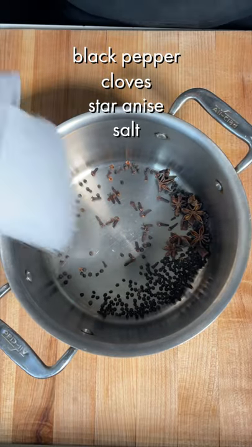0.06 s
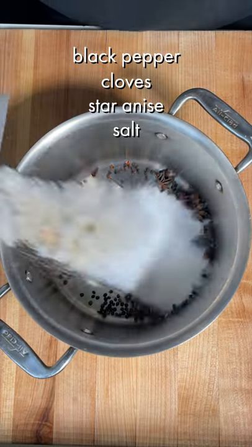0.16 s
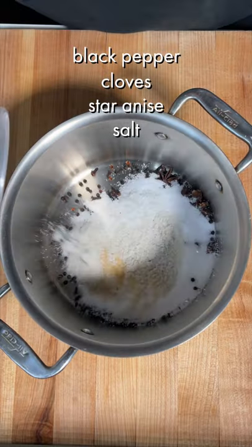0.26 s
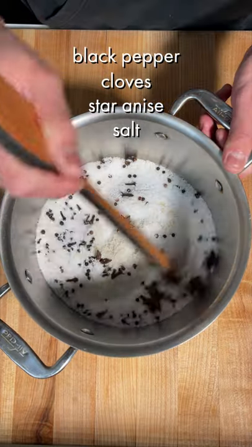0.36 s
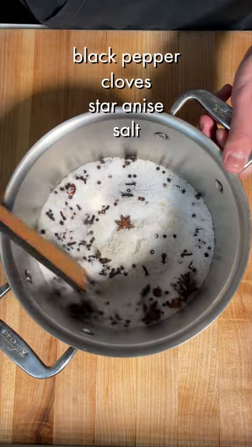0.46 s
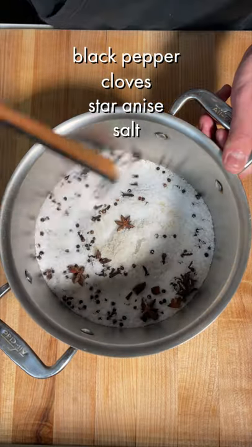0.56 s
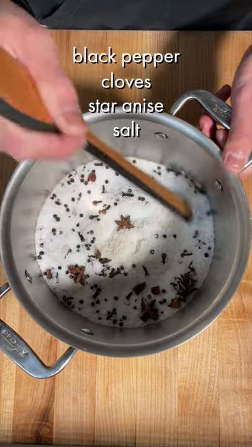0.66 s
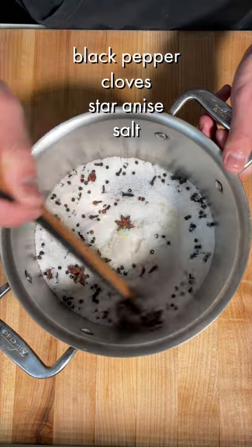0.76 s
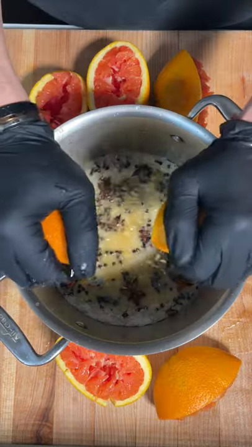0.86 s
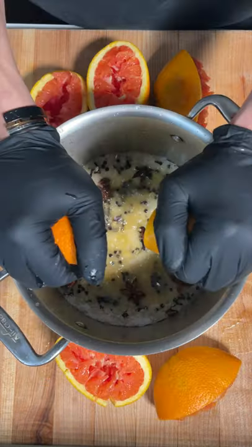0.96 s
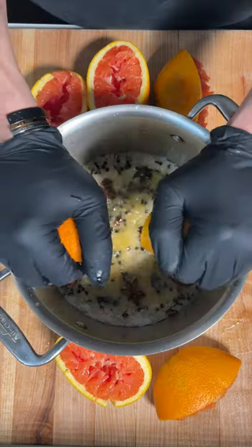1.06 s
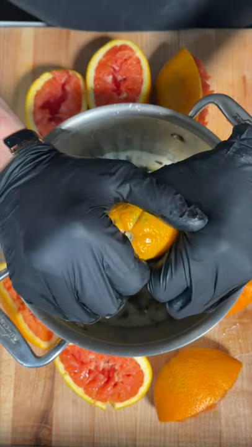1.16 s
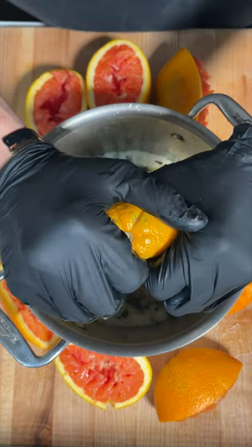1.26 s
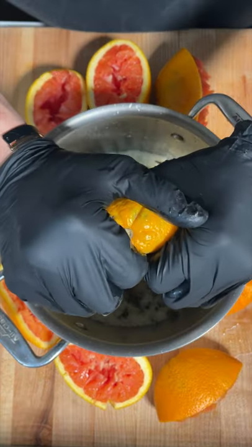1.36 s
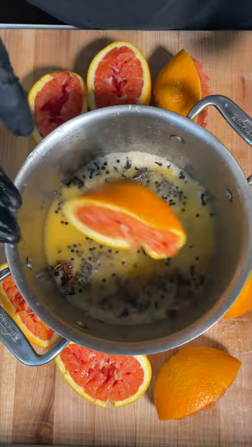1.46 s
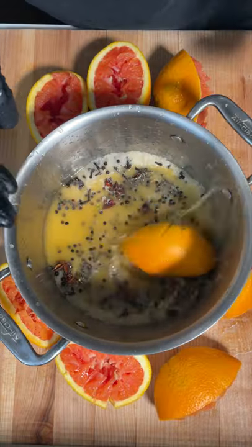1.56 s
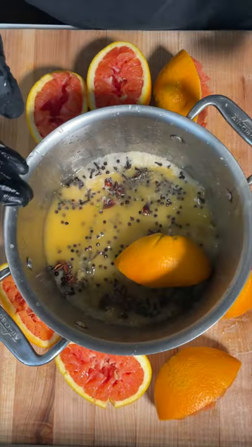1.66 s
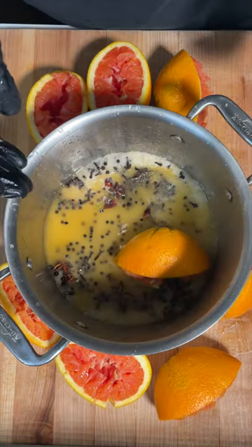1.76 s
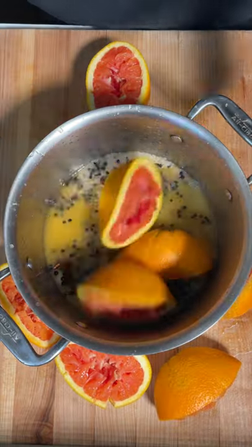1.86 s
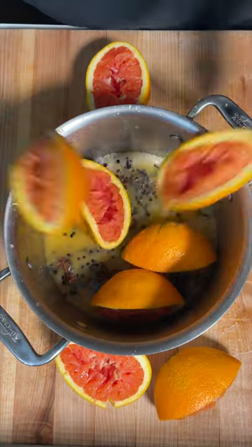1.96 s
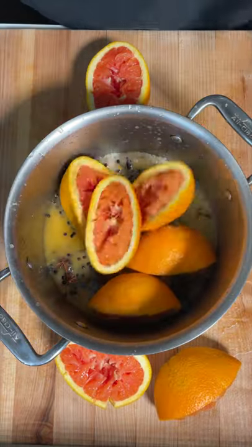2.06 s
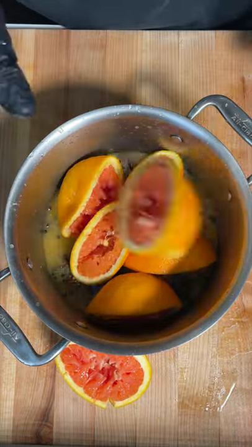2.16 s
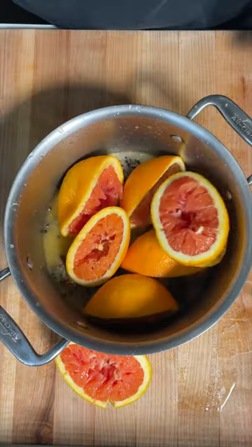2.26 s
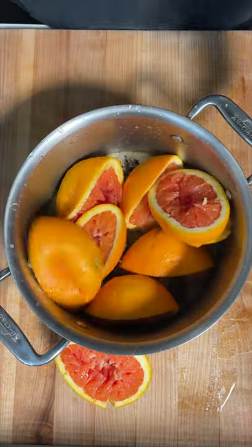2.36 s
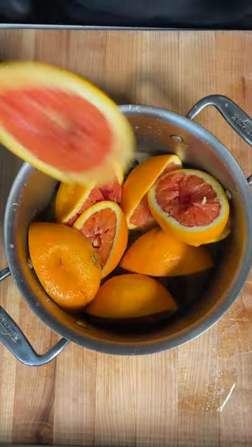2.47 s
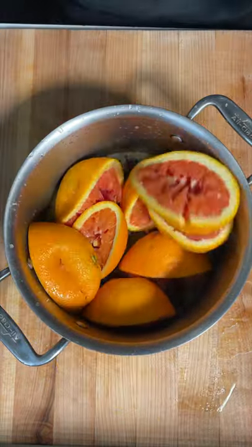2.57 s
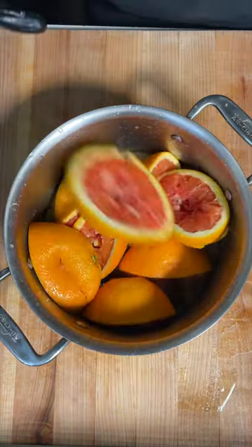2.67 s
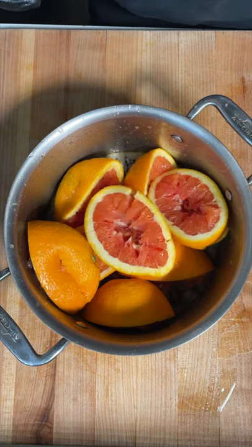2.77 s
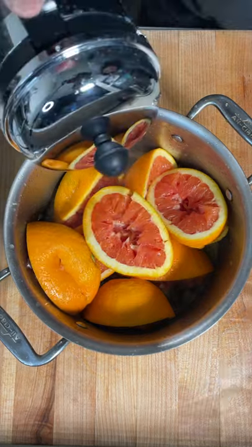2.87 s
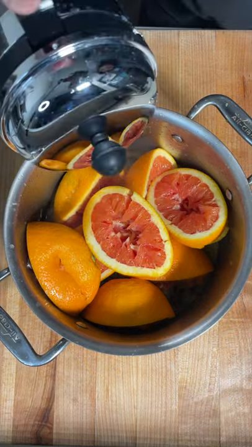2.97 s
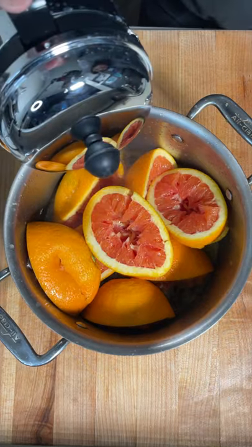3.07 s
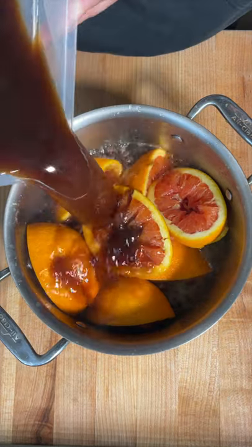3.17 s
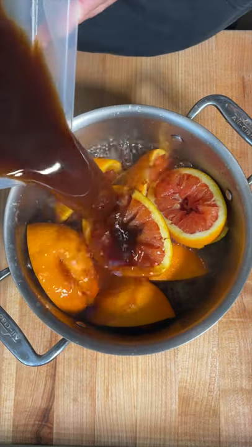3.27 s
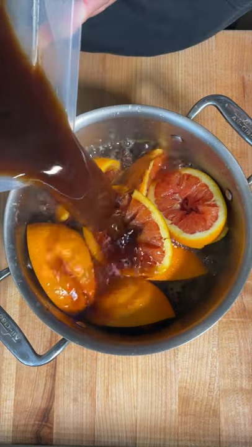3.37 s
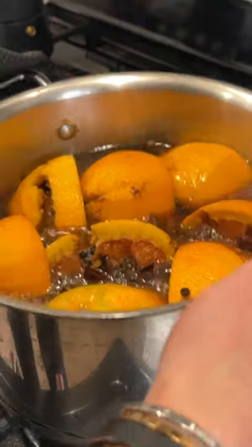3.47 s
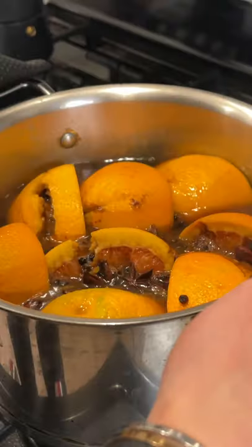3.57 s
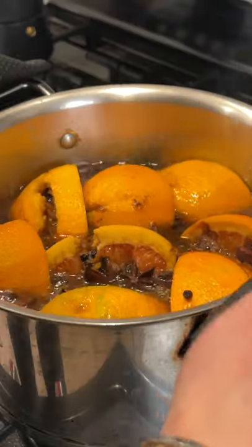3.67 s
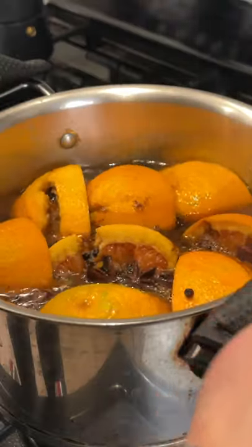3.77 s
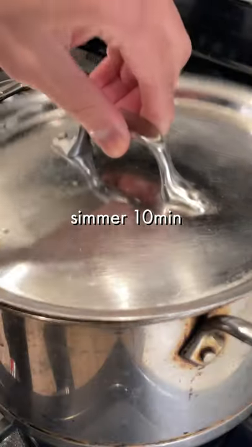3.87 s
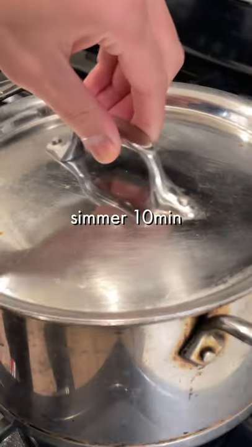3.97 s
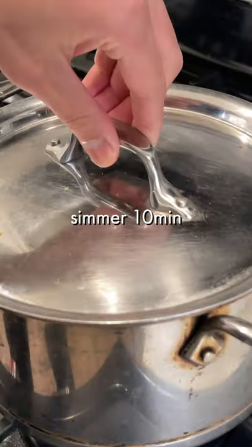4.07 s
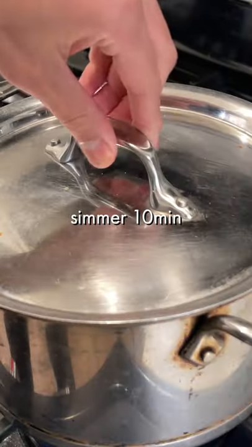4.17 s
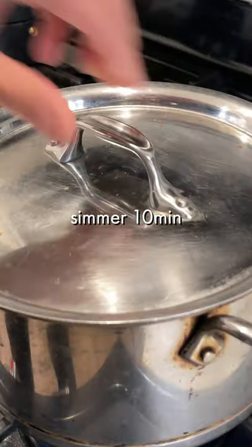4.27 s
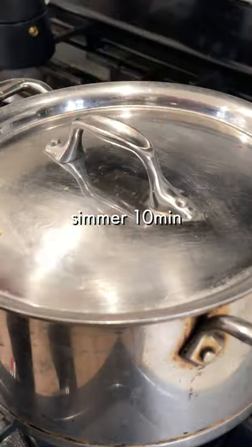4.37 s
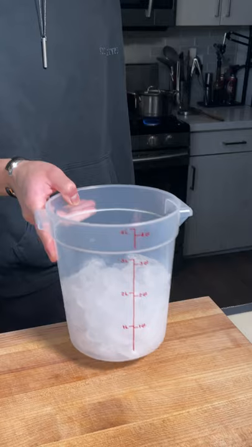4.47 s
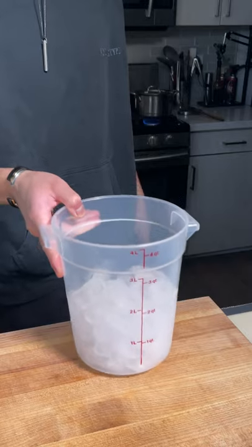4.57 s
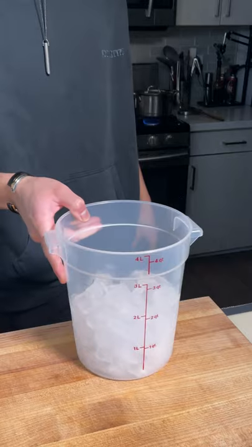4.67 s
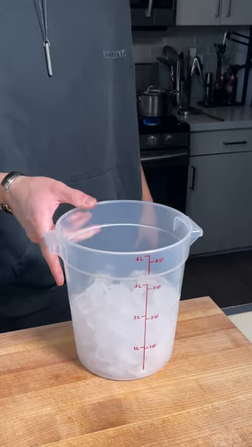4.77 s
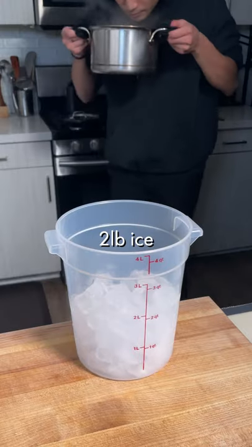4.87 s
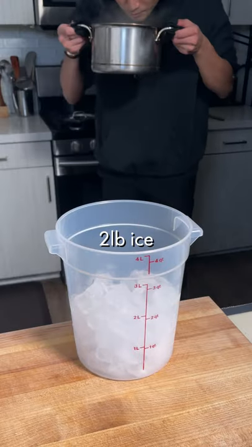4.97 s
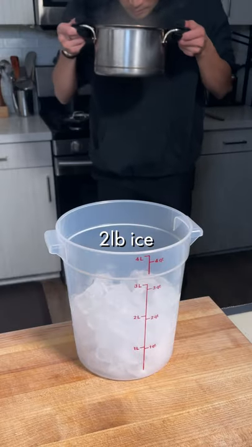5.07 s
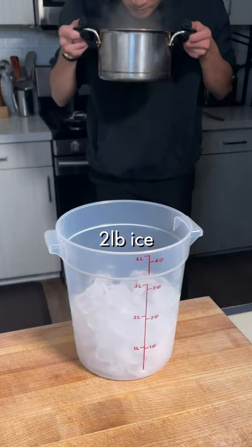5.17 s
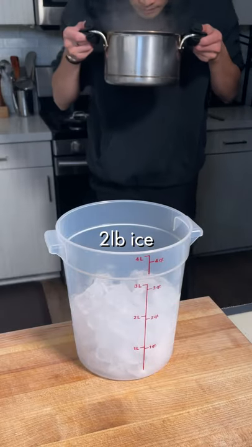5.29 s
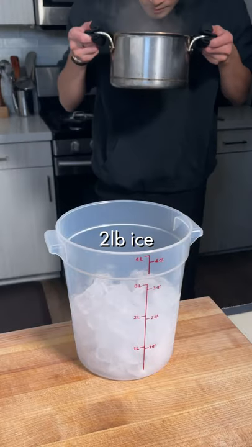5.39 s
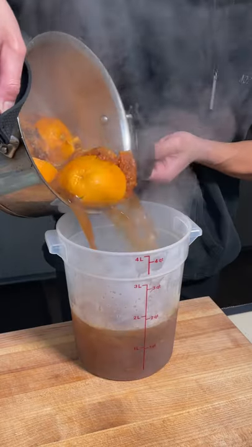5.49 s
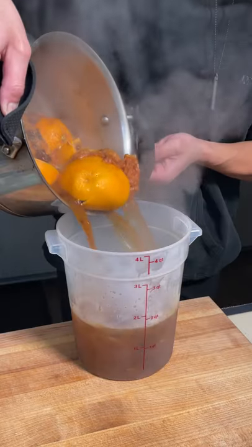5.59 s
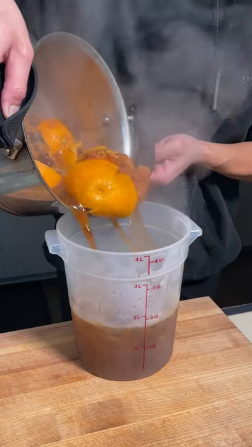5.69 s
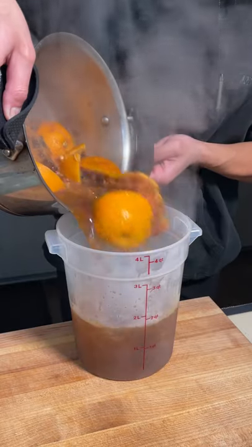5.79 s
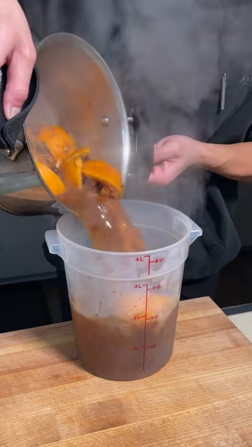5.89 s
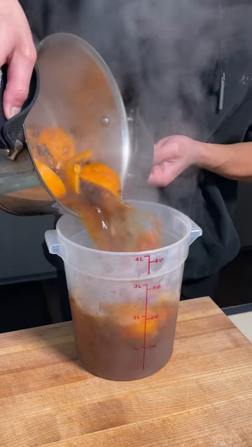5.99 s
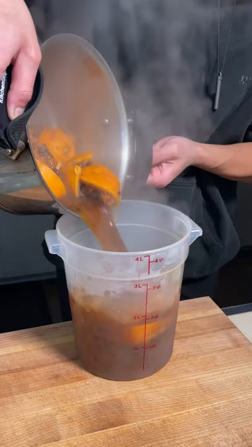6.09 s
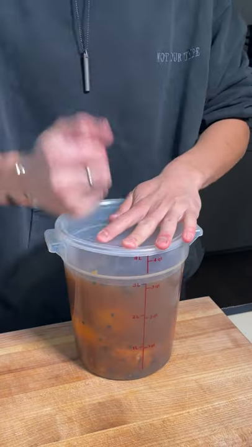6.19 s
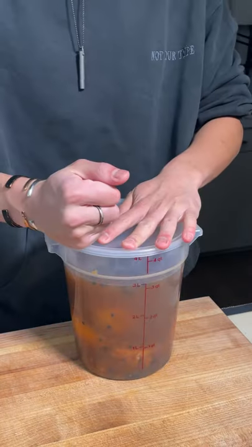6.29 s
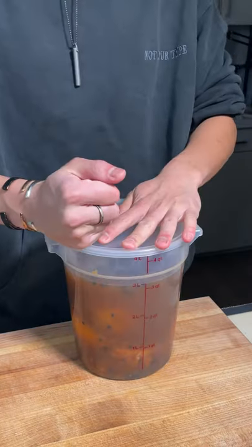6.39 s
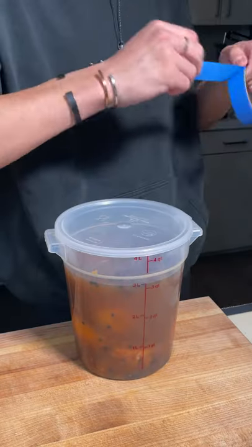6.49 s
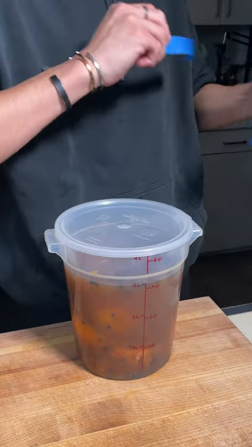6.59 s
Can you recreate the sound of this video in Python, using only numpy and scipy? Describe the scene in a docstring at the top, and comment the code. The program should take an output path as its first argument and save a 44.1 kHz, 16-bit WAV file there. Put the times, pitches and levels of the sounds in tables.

```python
"""Quick shots of a brine being made in a small kitchen, heard close up. First grains (shaped grit) hiss and hard
spices ring a steel pot; jets spit, a thin stream runs (swarms of chirping bubbles) and citrus halves slap down
(air pockets, squelch, spray). The pot jolts onto the stove, its lid clatters (struck modes) and the brine simmers.
Cloth rustles, a tub of ice knocks on the board, and hot brine and fruit are tipped in with splashes and gulps.
Last, a fist thumps the tub shut and tape rips off a roll. Low hum runs throughout; each shot has its own echo."""
import sys
import numpy as np
from scipy import signal
from scipy.fft import rfft, irfft, next_fast_len
from scipy.io import wavfile

SR = 44100
rng = np.random.default_rng(int(sys.argv[2]) if len(sys.argv) > 2 else 0)


def store_pcm(level_fs):
    """Save levels as 16-bit WAV."""
    pcm = np.round(np.clip(level_fs, -1, 1) * 32767).astype(np.int16)
    wavfile.write(sys.argv[1], SR, np.atleast_2d(pcm).T)


N = 292824
T = np.arange(SR // 2) / SR  # clock of one short sound, s


def amp(db):
    """Decibels to gain."""
    return 10 ** (np.asarray(db) / 20)


def unit(x):
    """Scale to rms 1."""
    return x / np.sqrt(np.mean(x ** 2) + 1e-20)


def along(points, hz):
    """Read a curve of (f/Hz, value) points on a log frequency axis."""
    f, v = np.transpose(points)
    return np.interp(np.log(hz + 1), np.log(f + 1), v)


def filtered(x, response):
    """Filter x by a response given as a function of frequency."""
    n = x.shape[-1]
    m = next_fast_len(n + 8192)  # padding leaves room for ringing
    return irfft(rfft(x, m) * response(np.fft.rfftfreq(m, 1 / SR)), m)[..., :n]


def colour(x, spectrum):
    """Shape x by a spectrum, at rms 1."""
    return unit(filtered(x, lambda hz: amp(along(spectrum, hz))))


def resonate(x, peaks):
    """Pass x through a body's resonances, signs alternating, at rms 1."""
    def response(f):
        total = 0
        for k, (centre, width, db) in enumerate(peaks):
            peak = 1j * f * width / (centre * centre - f * f + 1j * f * width)
            total = total + (-1) ** k * amp(db) * peak
        return total
    return unit(filtered(x, response))


def grit(size, spread_db):
    """Noise whose level jumps every 40 samples, like tiny impacts in clumps."""
    clumps = np.repeat(rng.standard_normal(size // 40 + 1), 40)[:size]
    return unit(rng.standard_normal(size) * amp(spread_db * clumps))


def fade(t60, attack):
    """Rise, then die away by 60 dB in t60 seconds."""
    return 1000 ** (-T / t60) * (1 - np.exp(-T / attack))


def burst(spectrum, t60, attack=0.00016, spread_db=3):
    """A dying puff of coloured grit."""
    return colour(grit(len(T), spread_db), spectrum) * fade(t60, attack)


def ring(modes, scatter_db):
    """Modes struck at slightly new strengths, neighbours swinging opposite ways."""
    out = np.zeros(len(T))
    for k, (hz, db, t60) in enumerate(modes):
        strength = (-1) ** k * amp(db + scatter_db * rng.normal())
        out += strength * np.sin(2 * np.pi * hz * T) * fade(t60, 0.0019)
    return out


def bubble(hz, cycles, rise, onset=0.28):
    """A pocket of air swells over `onset` cycles and rings, its pitch climbing as it surfaces."""
    life = cycles / hz
    pitch = hz * (1 + rise * np.minimum(T / life, 1))
    return np.sin(2 * np.pi * np.cumsum(pitch) / SR) * fade(life, onset / hz)


def bubbles(rate, hz, octaves, cycles, spread_db):
    """A steady swarm of small bubbles, `rate` per second, each chirping upward as it dies."""
    start, size, tone = rng.random((int(rate * N / SR), 3)).T[:, :, None]
    pitch = hz * 2 ** (octaves * (2 * tone - 1))
    t = T[:1000]
    age = t * pitch / cycles
    level = np.sqrt(pitch / hz) * amp(spread_db * np.minimum(-np.log(1 - size), 3))
    chirp = np.sin(2 * np.pi * pitch * t * (1 + 0.21 * np.minimum(age, 1)))
    waves = level * chirp * np.exp(-7 * age)
    place = (start * N).astype(int) + np.arange(len(t))
    return unit(np.bincount(place.ravel(), waves.ravel(), N)[:N])


def splash(hz, octaves, t60, count):
    """Droplets flung by an impact: each rings at its own pitch, the late ones weaker."""
    out = np.zeros(len(T))
    for delay, tone in rng.random((count, 2)):
        start = int(min(t60, .5) * delay ** 2 * SR / 2)  # crowded towards the impact
        drop = bubble(hz * 2 ** (octaves * (2 * tone - 1)), cycles=34, rise=0.1)
        out[start:] += drop[:len(T) - start] * 1000 ** (-T[start] / t60)
    return out / np.abs(out).max()


# edges of the shots: t/s
CUTS = [0, .32, .83, 1.5, 2.495, 2.83, 3.16, 3.495, 3.825, 4.495, 4.83, 5.487, 6.16, 6.5, 6.7]


def add(track, s, sound):
    """Lay a sound in at time s; it is cut off when its shot ends."""
    start = round(s * SR)
    shot_end = round(min(c for c in CUTS if c > s) * SR)
    end = min(shot_end, N, start + len(sound))
    track[start:end] += sound[:end - start]


def swell(s, rise, hold, t60):
    """Rise at time s, hold, die away; one gain per sample of the scene."""
    t, out = np.arange(SR) / SR, np.zeros(N)
    decay = 1000 ** (-np.maximum(t - rise - hold, 0) / t60)
    add(out, max(s, 0), np.minimum(t / rise, 1) * decay)
    return out


def flow(s, db, db_per_s):
    """Gain of something that starts at time s and steadily grows or thins out."""
    out = np.zeros(N)
    add(out, s, amp(db + db_per_s * np.arange(SR) / SR))
    return out


def flows(streams):
    """Bubbling and spray gains of running liquid."""
    gains = np.zeros((2, N))
    for s, bubbling_db, spray_db, change in streams:
        gains += np.array([flow(s, bubbling_db, change), flow(s, spray_db, change)])
    return gains


# spectrum of the low background hum: f/Hz, relative level/dB
HUM = [(22, -17), (60, 1.5), (130, -3), (300, -16.5), (2000, -37)]


def hum():
    """Steady noise weighted to the bass, under everything."""
    return amp(-46) * colour(rng.standard_normal(N), HUM)


# dry grains slide into the pot or are stirred: t/s, rise/s, hold/s, hiss level/dB, pot wall level/dB
GRAINS = [(0, 0.041, 0.044, -20, -39), (0.125, 0.0047, 0.029, -13.5, -27),
          (0.322, 0.011, 0.04, -23.5, -34.5), (0.437, 0.0093, 0.0029, -15.5, -34),
          (0.515, 0.044, 0.29, -30, -44.5)]
GRAINS_T60 = 0.35  # s, grains coming to rest
# hard spices and the spoon strike the pot: t/s, tick level/dB, ring level/dB
SPICES = [(0.4235, -6, -44), (0.517, -11.5, -10.5), (0.7166, -9, -32)]
# pot wall damped by salt: f/Hz, width/Hz, relative level/dB
WALL = [(539, 39, 11), (1230, 105, -5), (1905, 180, 2.5), (2380, 100, 7), (3700, 380, 4.5),
        (6000, 32, 14.5), (6690, 150, 13)]
# pot base under the spoon: f/Hz, width/Hz, relative level/dB
BASE = [(514, 8.3, 13), (2200, 500, -9)]
# spectra of dry hiss (also cloth) and of soft, dull matter (also fruit flesh): f/Hz, relative level/dB
HISS = [(1500, -26), (3500, -5), (6500, -0.5), (11000, 7)]
FLESH = [(150, 6), (500, 8), (1500, 5), (4000, 0.5), (9000, -99)]


def seasoning():
    """Salt hisses down the steel; hard pieces tick and ring the wall; the spoon scrapes across the base."""
    hiss, wall = np.zeros((2, N))
    for s, rise, hold, hiss_db, wall_db in GRAINS:
        motion = swell(s, rise, hold, GRAINS_T60)
        hiss += amp(hiss_db) * motion
        wall += amp(wall_db) * motion
    out = hiss * colour(grit(N, spread_db=2.5), HISS)
    out += wall * (resonate(grit(N, spread_db=6.5), WALL) + amp(-7) * colour(grit(N, spread_db=6), FLESH))
    scrape = swell(.655, rise=.03, hold=.045, t60=GRAINS_T60)
    out += amp(-33) * scrape * resonate(grit(N, spread_db=2), BASE)
    for s, db, ring_db in SPICES:
        add(out, s, amp(db) * burst(HISS, t60=0.059))
        wall_ring = resonate(rng.standard_normal(len(T)), WALL) * fade(0.082, 0.0006)
        add(out, s, amp(ring_db) * (wall_ring + burst(FLESH, t60=0.032)))
    return out


# spoon or fruit strikes the bare wall: t/s, ring level/dB
WALL_HITS = [(.5171, -29), (2.213, -38), (2.3812, -19.5)]
# modes of the bare pot: f/Hz, relative level/dB, t60/s
POT = [(554, -2, .1), (1195, -9, .55), (1921, -2, .22), (2379, -1, .2)]


def pot_wall():
    """The hardest blows leave the steel wall singing in its own modes."""
    out = np.zeros(N)
    for s, db in WALL_HITS:
        add(out, s, amp(db) * ring(POT, scatter_db=3.5))
    return out


# spoon and hands nudge the pot: t/s, thud level/dB
NUDGES = [(0.52, -17), (.926, -15)]
# spectrum of soft low thumps: f/Hz, relative level/dB
THUMP = [(40, -2.5), (130, 13), (450, 6.5), (2000, -19)]


def board(high_hz, low_hz, glide):
    """Bending waves spread in the board: the high ones arrive first, the boom last; its edges scatter them."""
    out = np.zeros(N)
    for s, db in NUDGES + [(s, thud_db) for s, *_, thud_db in FRUIT]:
        pitch = low_hz + high_hz * np.exp(-T / glide)
        sweep = np.sin(2 * np.pi * np.cumsum(pitch) / SR) * fade(0.2, 0.04)
        echoes = unit(rng.standard_normal(len(T))) * fade(.06, .002)
        scattered = signal.fftconvolve(sweep, echoes)[:len(T)]
        thump = amp(-12.5) * burst(THUMP, t60=0.15, attack=0.0047)
        add(out, s, amp(db) * (sweep + unit(scattered) * sweep.std() + thump))
    return out


# thin streams, each running until its shot ends: t/s, bubbling level/dB, spray level/dB, change/(dB/s)
STREAMS = [(.8305, -51, -39.5, 5.5), (2.838, -41, -31, -13), (3.1605, -34.5, -31.5, 10.5)]
# air inside the pot: f/Hz, width/Hz, relative level/dB
POT_AIR = [(1258, 190, -4), (2122, 120, 17.5), (3505, 62, 9.5)]
# spectra of churning liquid and of fine spray: f/Hz, relative level/dB
SLOSH = [(150, -11), (600, -14.5), (1400, -7), (2700, -9.5), (9000, -24.5)]
SPRAY = [(2000, -17), (4500, -17), (10500, -6.5), (13500, -8)]


def pouring():
    """A thin stream bubbles, fizzes and drums on the fruit in the pot."""
    bubbling, spray = flows(STREAMS)
    plops = bubbles(rate=400, hz=2300, octaves=1.15, cycles=34, spread_db=3.5)
    churn = colour(grit(N, spread_db=5), SLOSH)
    out = bubbling * (plops + amp(-9) * resonate(plops, POT_AIR) + amp(-12) * churn)
    out += amp(-5.5) * bubbling * colour(grit(N, spread_db=1.5), THUMP)
    fizz = bubbles(rate=1500, hz=7800, octaves=.55, cycles=30, spread_db=5)
    return out + spray * (amp(-2) * fizz + colour(grit(N, spread_db=5), SPRAY))


# fine jets of liquid spit: t/s, level/dB
SQUIRTS = [(0.881, -18), (0.891, -12), (0.977, -17), (1.053, -14.5), (1.18, -14), (1.2487, -9.5),
           (1.64, -12), (3.1706, -2.5), (3.2167, -8.5), (3.3915, -6.5)]
# the biggest drops plink: t/s, level/dB, starting f/Hz
DRIPS = [(1.029, -22, 3160), (1.0901, -8, 1760), (1.196, -20.5, 2000), (1.238, -18, 3020),
         (1.264, -16, 2070), (1.295, -14.5, 1220), (1.301, -10.5, 3800), (1.318, -12.5, 1290),
         (1.352, -19, 900), (1.391, -18.5, 3350), (3.166, -12.5, 2120), (3.173, 1.5, 4640),
         (3.19, -10, 1435), (3.2156, -6, 3360), (3.275, -10, 2270), (3.356, -9.5, 3900), (3.468, -11, 2340)]
# drops of a trickle tap on the peel: t/s, level/dB
TAPS = [(2.852, -17), (2.865, -22), (2.907, -20), (2.92, -18.5), (2.947, -18.5), (3.013, -19.5),
        (3.112, -22.5)]
# spectrum of a dry plastic-like click: f/Hz, relative level/dB
PLASTIC = [(800, -2.5), (2400, -1.5), (4000, -9), (11000, -18.5)]


def droplets():
    """Jets spit, big drops plink, small ones tap on the peel; the air in the pot rings along."""
    out = np.zeros(N)
    for s, db in SQUIRTS:
        jet = burst(SPRAY, t60=.02) + splash(8000, octaves=.5, t60=.02, count=16)
        add(out, s, amp(db) * jet)
    for s, db, hz in DRIPS:
        blip = bubble(hz, cycles=30, rise=.25, onset=2.5)
        add(out, s, amp(db) * (blip + amp(-9) * splash(1.4 * hz, octaves=.8, t60=.14, count=10)))
    for s, db in TAPS:
        tap = bubble(1300 * rng.uniform(.9, 1.4), cycles=14, rise=0)
        add(out, s, amp(db) * (tap + amp(-3) * burst(PLASTIC, t60=.014)))
    return out + amp(-9) * out.std() * resonate(out, POT_AIR)


HOLLOW_HZ = 586  # base pitch of air trapped under a cut face, varied for each blow


def slap(hz):
    """Wet flesh meets the pot: air pockets ring at the rim and under the cut face, then pulp squelches."""
    rim = bubble(hz, cycles=22, rise=0.03)
    hollow = bubble(HOLLOW_HZ * rng.uniform(.9, 1.1), cycles=16, rise=0)
    squelch = splash(1200, octaves=1, t60=.18, count=10)
    return rim + amp(-2.5) * hollow + amp(-9) * squelch + amp(-7) * burst(FLESH, t60=0.06)


def spatter():
    """Juice flies off a blow as clumped spray and ringing droplets."""
    drops = splash(7750, octaves=0.53, t60=0.13, count=20)
    return burst(SPRAY, t60=0.098, spread_db=12.5) + amp(-6.0) * drops


# wet halves land; board() plays the thuds: t/s, slap level/dB, trapped air f/Hz, spatter level/dB, thud level/dB
FRUIT = [(1.527, -12.5, 2330, 2, -16), (1.877, -10.5, 2140, -3.5, -11), (2.024, -10.5, 1320, -12.5, -18.5),
         (2.111, -20, 1280, -10.5, -32.5), (2.182, -14.5, 1570, -28, -20.5),
         (2.213, -9, 1400, -11.5, -18.5), (2.341, -11.5, 1030, -19, -45), (2.369, -10, 1580, -4, -28),
         (2.3822, -6, 890, -19, -7), (2.53, -13, 1440, -7.5, -17.5), (2.692, -13.5, 1034, -17, -16.5)]
# halves tip over onto their cut faces: t/s, slap level/dB
FLOPS = [(1.825, -29), (1.861, -26), (2.051, -24), (2.195, -17), (2.56, -20.5), (2.601, -24), (2.741, -23),
         (2.8, -29.5)]


def citrus():
    """Each half slaps into the pot; some then flop over with a hollow sound."""
    out = np.zeros(N)
    for s, db, hz, spatter_db, thud_db in FRUIT:
        add(out, s, amp(db) * slap(hz) + amp(spatter_db) * spatter())
    for s, db in FLOPS:
        add(out, s, amp(db) * (slap(HOLLOW_HZ * rng.uniform(1, 1.98)) + amp(-2.5) * spatter()))
    return out


# pot jolts over the stove grate: t/s, level/dB
GRATE = [(3.512, -15), (3.526, -11.5), (3.539, -7), (3.555, -35)]
# spectrum of the grate: f/Hz, relative level/dB
IRON = [(40, -20), (130, 7), (400, 1), (800, -11.5), (10000, -16)]
# lid rim contacts: t/s, clang level/dB, thump level/dB
LID = [(3.865, -10.5, -17.5), (3.909, -13.5, -6.5), (3.922, -11.5, -20), (3.989, -20.5, -8),
       (4.002, -19, -15)]
# strongest modes of the steel lid: f/Hz, relative level/dB
STEEL_LID = [(419, -3), (590, -3), (1448, -3), (1668, -1), (1750, -2), (2240, -3), (2719, -5), (2906, -6),
             (6153, -9)]
LID_T60 = .115  # s, for those strongest modes
# spectrum of the clang: f/Hz, relative level/dB
CLANG = [(250, -36), (450, -6.5), (1600, -2), (4700, -17), (9200, -9)]
# resonances of the simmer under the lid: f/Hz, width/Hz, relative level/dB
STEAM = [(1414, 130, -1.5), (5230, 170, -10), (9160, 58.4, -3.5)]


def stove():
    """The pot jolts onto the grate, the lid clatters shut, the brine simmers as resonant noise, ever fainter."""
    out = np.zeros(N)
    for s, db in GRATE:
        add(out, s, amp(db) * burst(IRON, t60=0.16, attack=0.0018))
    strong = [(hz, level, LID_T60) for hz, level in STEEL_LID]
    sheet_hz = (np.arange(20, 105) + rng.random()) ** 2  # the lid's many weaker modes
    sheet = [(hz, along(CLANG, hz), .1) for hz in sheet_hz]
    for s, db, thump_db in LID:
        metal = ring(strong, scatter_db=3) + amp(-5) * ring(sheet, scatter_db=3)
        add(out, s, amp(db) * (burst(CLANG, t60=.045) + amp(-7) * metal))
        add(out, s, amp(thump_db) * burst(THUMP, t60=0.066, attack=0.0045))
    simmer = flow(3.826, db=-49.5, db_per_s=-5.5)
    steam = resonate(rng.standard_normal(N), STEAM)
    return out + simmer * (steam + amp(-8.0) * colour(rng.standard_normal(N), SLOSH))


# clothes rustle: t/s, rise/s, hold/s, level/dB
RUSTLES = [(4.495, 0.044, 0.17, -41), (4.833, 0.19, 0.014, -36), (5.22, 0.016, 0.18, -44.5)]


def clothes():
    """Cloth brushes softly as the cook moves: swells of hiss and duller noise."""
    motion = sum(amp(db) * swell(s, rise, hold, t60=0.3) for s, rise, hold, db in RUSTLES)
    dull = colour(rng.standard_normal(N), FLESH)
    return motion * (colour(grit(N, spread_db=2.0), HISS) + amp(-11.5) * dull)


# modes of the loaded tub: f/Hz, relative level/dB, t60/s
TUB = [(75.8, -25.5, 0.21), (377, -1.5, 0.028), (464, 5.5, 0.027), (453, -27.5, 0.43)]


def ice_tub():
    """The loaded tub knocks on the board and the ice jumps once; later something bumps softly."""
    out = np.zeros(N)
    add(out, 4.6165, amp(5.5) * ring(TUB, scatter_db=4.0) + amp(-4.0) * burst(PLASTIC, t60=0.021))
    add(out, 4.631, amp(-15.0) * burst(PLASTIC, t60=0.065))
    add(out, 5.219, amp(-35.0) * burst(THUMP, t60=0.21))
    return out


# brine runs onto the ice: t/s, bubbling level/dB, spray level/dB, change/(dB/s)
BRINE = [(5.492, -30, -29, -14)]
# lumps of fruit tumble in with it: t/s, splash level/dB, gulp f/Hz
PLUNGES = [(5.52, -31.5, 970), (5.591, -41, 492), (5.644, -37.5, 1530), (5.698, -35, 2380),
           (5.758, -42, 486), (5.808, -36.5, 2240), (5.871, -10.5, 1330), (6.05, -28, 792)]
PLUNGE_RISE_S = 0.006  # the gulp follows the splash by this much


def tipping():
    """The whole pot gushes onto the ice; each lump of fruit splashes and gulps air."""
    plunge = np.zeros(N)
    for s, db, hz in PLUNGES:
        plunge += amp(db) * swell(s, PLUNGE_RISE_S, hold=0.0053, t60=0.41)
    gush, mist = flows(BRINE)
    gush = gush + plunge
    mist = mist + amp(-10) * plunge
    swarm = bubbles(rate=450, hz=1300, octaves=1.25, cycles=28, spread_db=4)
    out = gush * (amp(-4.5) * swarm + amp(-6) * colour(grit(N, spread_db=3), SLOSH))
    for s, db, hz in PLUNGES:
        gulp = bubble(hz, cycles=36, rise=.12, onset=2) + splash(hz, octaves=1, t60=.2, count=10)
        add(out, s + PLUNGE_RISE_S, amp(db + 7) * gulp)  # gulps stand above the splash
    return out + amp(-2.5) * mist * colour(grit(N, spread_db=4), SPRAY)


# modes of the tub's lid: f/Hz, relative level/dB, t60/s
TUB_LID = [(57, -22, 0.5), (140, -2, 0.055), (240, 1, 0.03), (640, 0, 0.02)]


def sealing():
    """A hissing puff, then a fist thumps the lid over the rim; last, tape tears off its roll."""
    out = np.zeros(N)
    add(out, 6.219, amp(0.5) * burst(SPRAY, t60=0.074, attack=0.0093))
    add(out, 6.2235, amp(-4.5) * ring(TUB_LID, scatter_db=1) + amp(-7) * burst(PLASTIC, t60=0.035))
    add(out, 6.5475, amp(-23) * burst(PLASTIC, t60=0.03) + amp(0.5) * burst(SPRAY, t60=0.032))
    return out


def ports(x, lag_ms, left_db):
    """Sound reaches the left port later (earlier if lag is negative) and left_db louder than the right."""
    turn = np.array([[-1j], [1j]]) * np.pi * lag_ms / 1000  # half the lag on each side
    return filtered(x, lambda hz: np.exp(turn * hz)) * amp([[left_db / 2], [-left_db / 2]])


# reverberation of the kitchen: f/Hz, t60/s
KITCHEN = [(60, 1), (250, 0.48), (1500, 0.72), (10000, 0.42)]
# likeness of the echoes at the two ports: f/Hz, likeness (1 = identical)
ALIKE = [(150, 0.99), (300, 0.64), (1200, 0)]


def kitchen(x, early_db):
    """Near walls and a longer tail answer as decaying noise, drawn anew in every shot."""
    out = np.zeros((2, N))
    for start, end in zip(CUTS, CUTS[1:]):
        hz, t, z = signal.stft(rng.standard_normal((2, len(T))), SR, nperseg=256)
        turn = np.arccos(np.clip(along(ALIKE, hz), -1, 1))[:, None] / 2
        z = z * np.array([np.cos(turn), np.sin(turn)])  # weights of mid and side
        z = z * 1000 ** (-t / along(KITCHEN, hz)[:, None])
        mid, side = signal.istft(z, SR, nperseg=256)[1][:, :len(T)]
        tail = np.array([mid + side, mid - side])
        tail = tail * (1 + amp(early_db) * fade(0.063, 0.0011)) * (1 - np.exp(-T / 0.0009))
        tail = tail / np.linalg.norm(tail[0])
        shot = slice(round(start * SR), round(end * SR))
        out[:, shot] = signal.fftconvolve(x[None, shot], tail, axes=1)[:, :len(x[shot])]
    return out


def scene():
    """Work at the board is close; the stove stands to the left; the kitchen answers both."""
    near = seasoning() + board(high_hz=893, low_hz=54.6, glide=0.0099)
    near += pouring() + droplets() + citrus()
    near += clothes() + ice_tub() + tipping() + sealing()
    hob = stove()
    direct = ports(near + pot_wall(), lag_ms=0.029, left_db=0.5)
    direct = direct + ports(hob, lag_ms=-0.022, left_db=5.5)
    echo = kitchen(amp(-4.5) * (near + hob), early_db=18.0)
    return direct + echo + hum()


# treble response of the microphone: f/Hz, level/dB
MIC = [(11000, 0), (11600, -6), (12800, -21)]
TOP_HZ = 12900  # nothing passes from here up


def record(dry):
    """The microphone rounds off the highest peaks and loses the top treble."""
    limited = dry / (1 + np.abs(dry) ** 8) ** (1 / 8)
    return filtered(limited, lambda hz: amp(along(MIC, hz)) * (hz < TOP_HZ))


dry = scene()
out = record(dry)
store_pcm(out)
```